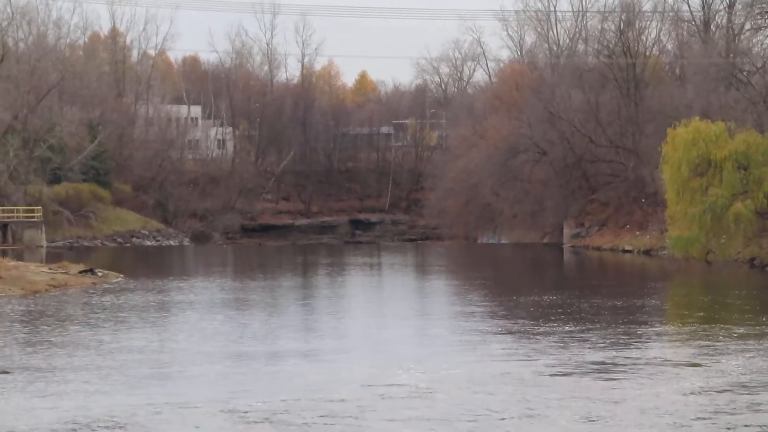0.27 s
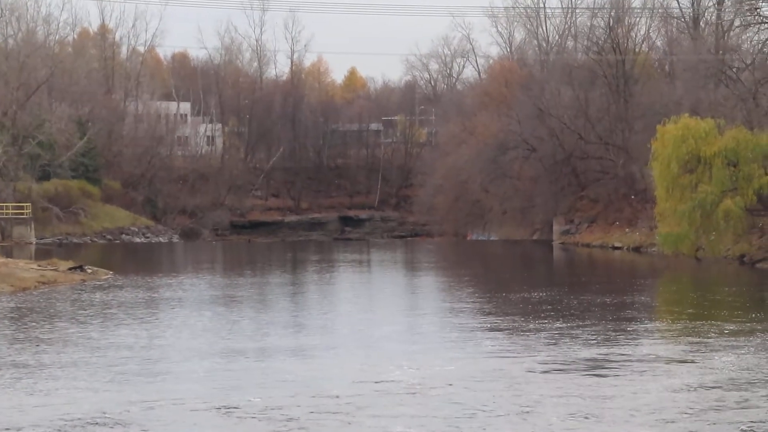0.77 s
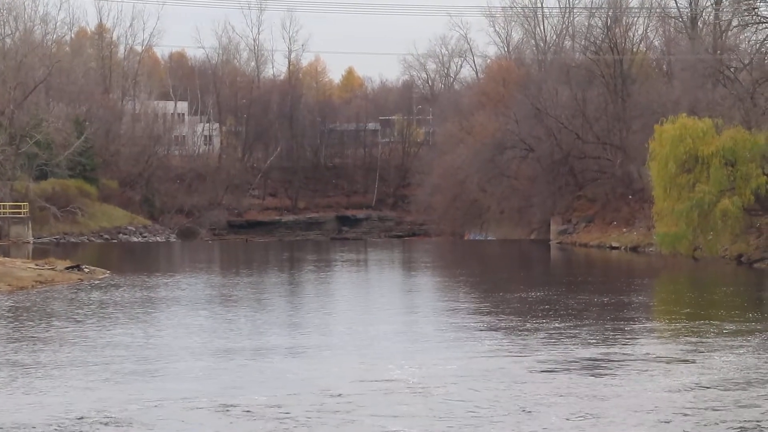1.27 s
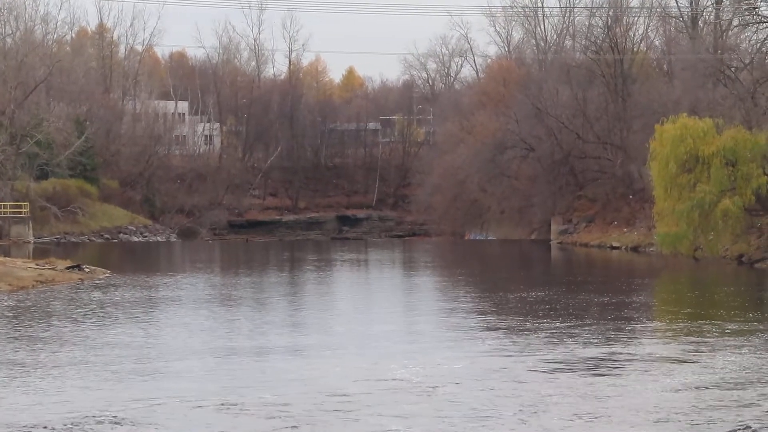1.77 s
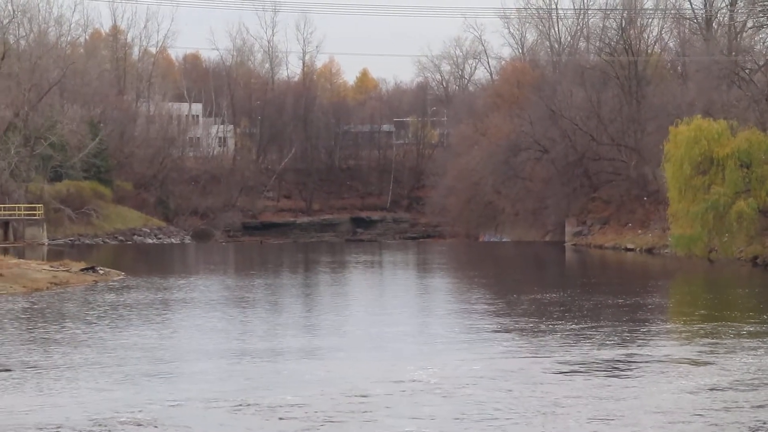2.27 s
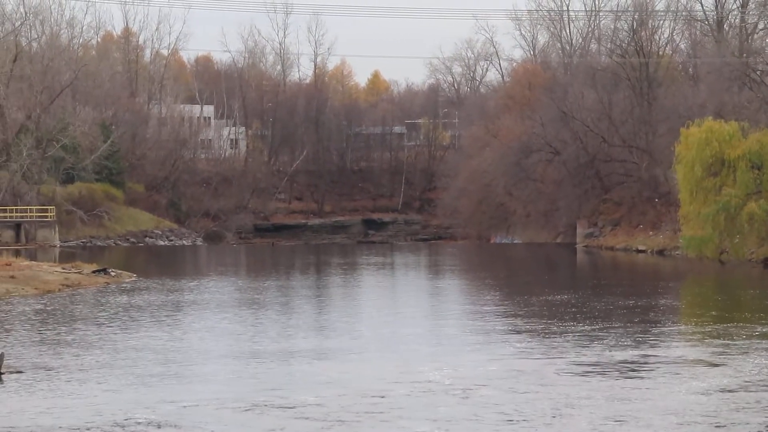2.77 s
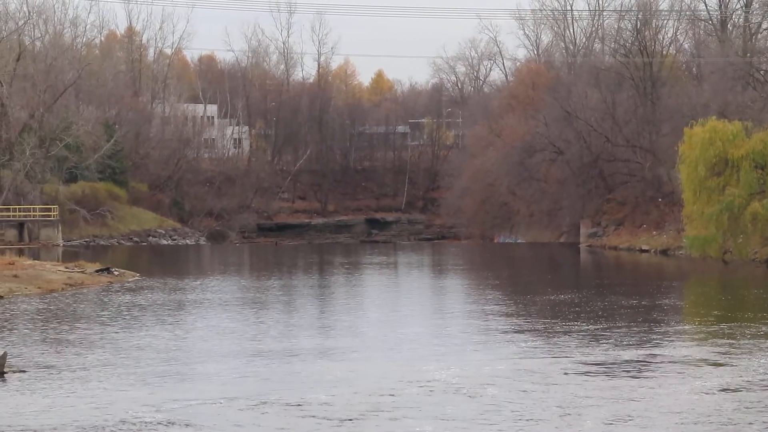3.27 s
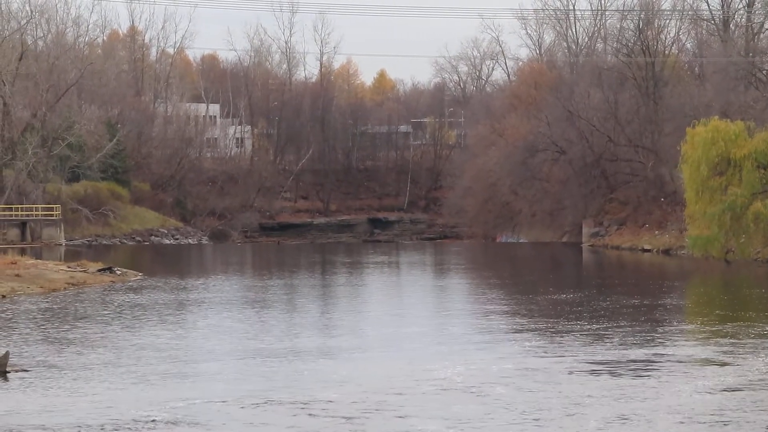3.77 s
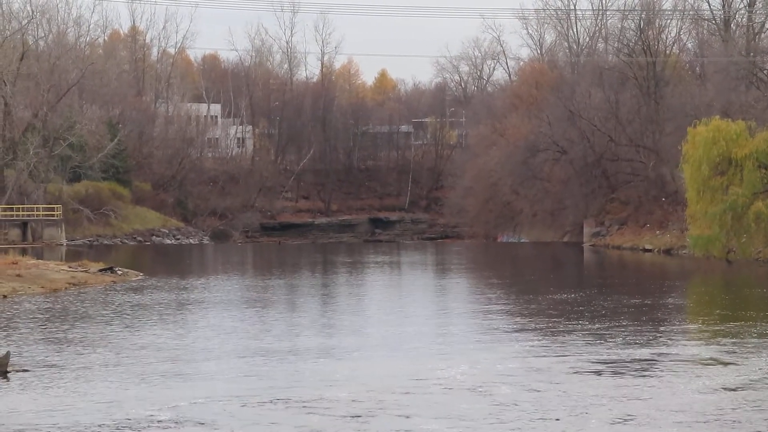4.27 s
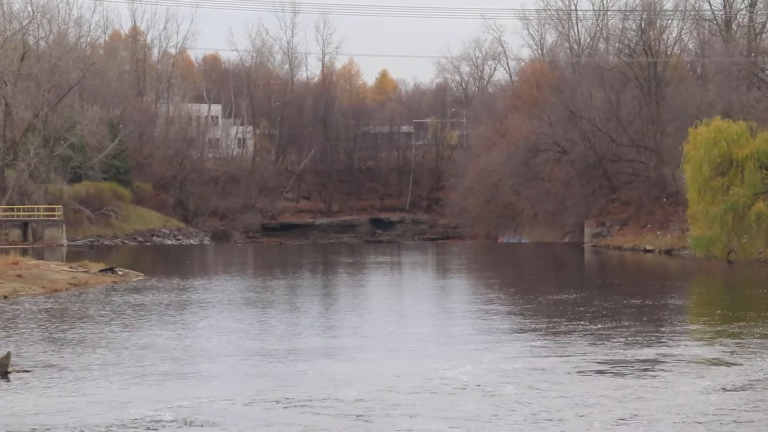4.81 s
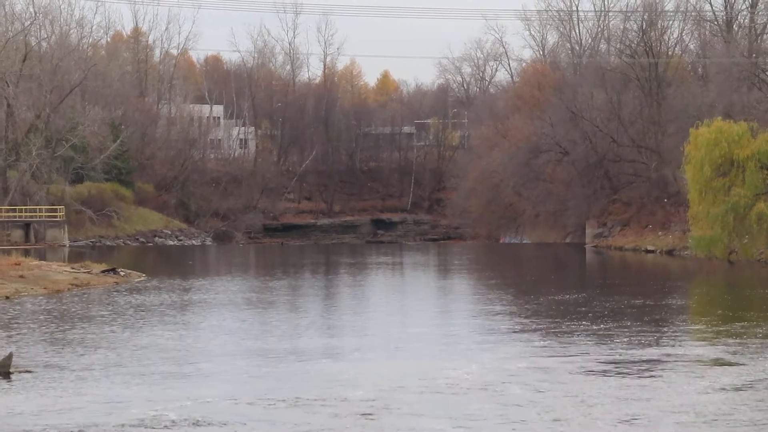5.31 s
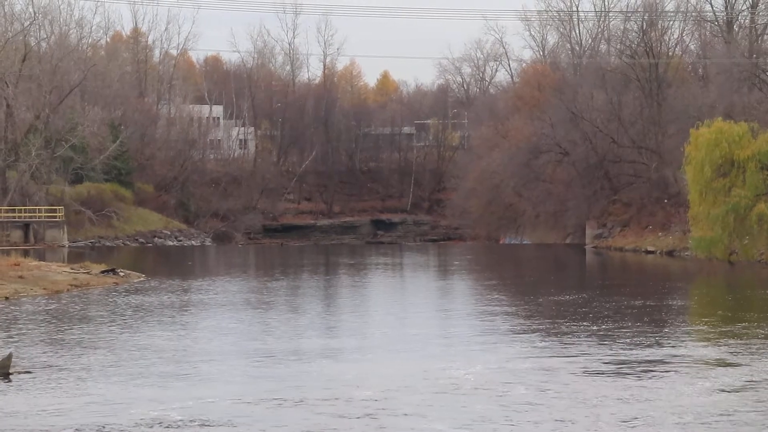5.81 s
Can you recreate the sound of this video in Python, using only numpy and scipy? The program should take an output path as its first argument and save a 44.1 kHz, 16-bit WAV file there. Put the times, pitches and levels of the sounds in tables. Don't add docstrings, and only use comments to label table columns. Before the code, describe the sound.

A steady bed runs throughout: rapids fizzing in the treble, tyre roar in the middle, deep traffic rumble and bridge boom below. The treble is muted for the first quarter second, then opens. A joint ticks at 0.3 s while a lorry hums faintly, strongest near 1 s and gone soon after 1.25 s. From 1.2 s a van pulls away, its low, wavering hum climbing and swelling unevenly. Traffic peaks at 2.0 s with a loud tick and hollow thud; faint knocks follow at 2.25, 2.8 and 3.1 s, then a soft double thud at 3.8 s. A brief tyre whine drops in pitch around 4.2 s. At 4.5 s the van shifts, its note falling, then holding lower. A car revs upward from 4.6 s to the end; a lorry drones in at 5.6 s. Background traffic eases slightly. Close, narrow stereo outdoors, with a very short bank echo.

```python
import sys
import numpy as np
from scipy import signal
from scipy.fft import rfft, irfft, next_fast_len
from scipy.io import wavfile
from scipy.ndimage import uniform_filter1d, map_coordinates

SR = 44100
rng = np.random.default_rng(int(sys.argv[2]) if len(sys.argv) > 2 else 0)


def volts(x):
    e = np.asarray(x, float) / 20
    return 10 ** e


def output_pcm(signal):
    pcm = np.clip(np.atleast_2d(signal).T, -1, 1) * 32767
    wavfile.write(sys.argv[1], SR, np.round(pcm).astype(np.int16))


N = 266805

# start_s, swell_db
TRAFFIC_SWELL = [(0, -.5), (.4, 0.1), (1.2, .5), (1.9, 0.1), (2.03, 1.5), (2.15, 0.5), (2.9, 0),
                 (3.8, -0.07), (4.3, -0.7), (5.3, -0.97), (6.05, -1)]
# freq_hz, level_db
BOOM_SPECTRUM = [(15, -45), (25, -20), (33, 9), (40, 5), (48, 14), (62, -31), (90, -51.5)]
# freq_hz, level_db
RUMBLE_SPECTRUM = [(35, -28), (55, -5.5), (75, -1), (110, -1), (180, -2.5), (240, -3), (320, -4.5),
                   (420, -10.5), (520, -15), (700, -49)]
# freq_hz, level_db
TYRE_SPECTRUM = [(240, -7), (400, -7), (542, -2.5), (891, -2), (2390, -13.5), (3000, -21.5), (3900, -29.5),
                 (6600, -120)]
# freq_hz, level_db
RAPIDS_SPECTRUM = [(1300, -11), (2200, -10), (2900, -4.5), (3500, -8), (5000, -10), (6500, -14),
                   (8300, -20), (10000, -22.5), (12000, -24)]
# start_s, tick_db, thud_db
KNOCKS = [
    (0.3254, -17, -22),
    (2.0168, -17.5, -17),
    (2.2544, -27, -26),
    (2.7654, -27, -26),
    (3.0574, -26, -27),
    (3.824, -32, -19),
    (3.841, -30, -18),
]
# freq_hz, level_db, t60_s
TICK_MODES = [(1200, -4, .013), (1570, -1, .013), (2025, 2, .015), (2720, -1, .012), (3280, -3, .012),
              (3950, -8, .01), (4350, -4, .013), (6100, -15, .009)]
# freq_hz, level_db, t60_s
THUD_MODES = [(190, -4, .05), (260, -4, .045), (340, -4, .045), (445, 0, .07), (620, -5, .04),
              (780, -7, .03)]
# start_s, pitch_hz, level_db
TYRE_WHINE = [
    (4.12, 254.7, -48),
    (4.2, 253.6, -33),
    (4.28, 241.8, -23.5),
    (4.35, 225, -37),
]
# start_s, firing_hz, level_db
IDLING_LORRY = [
    (0.3, 103.4, -46),
    (0.45, 102.6, -37),
    (0.7, 103.3, -32),
    (0.95, 107.2, -27.5),
    (1.1, 113.5, -31.5),
    (1.25, 120, -28.5),
]
# start_s, firing_hz, level_db
LATE_DRONE = [
    (5.55, 84.7, -38),
    (5.72, 86.2, -28),
    (6.05, 88.3, -29),
]
# start_s, firing_hz, level_db
FOLLOWING_CAR = [
    (4.62, 95.5, -31),
    (4.72, 104.2, -26),
    (4.84, 116.6, -30),
    (5.08, 126, -21),
    (5.2, 128.7, -23.5),
    (5.44, 139.4, -22.5),
    (5.8, 141.3, -19),
    (6.05, 147.6, -19),
]
# start_s, firing_hz, effort_db
VAN_ENGINE = [(1.2, 43.27, -9), (1.34, 50.7, 2), (1.46, 55.7, 0), (1.75, 62.45, .1), (1.95, 66.77, 4),
              (2.1, 69.2, 1), (2.35, 71.2, 0.5), (2.9, 79.97, 1.5), (3.45, 87.45, 0), (3.75, 91.95, 2.5),
              (4.01, 96.8, -.5), (4.34, 101.1, 1), (4.46, 102.2, 2), (4.62, 93.05, 1), (4.8, 86.56, -2.8),
              (4.95, 84.7, 3.5), (5.5, 86.16, -4), (6.05, 87, -2.5)]
# multiple of the firing rate, level_db, share needing load (0-1)
VAN_STRONG_ORDERS = [(1, 0, 0.18), (2, -0.83, .02), (3, -5.5, .7), (4, -15, 0.51)]
# multiple of the firing rate, level_db
VAN_FAINT_ORDERS = [(5, -3.5), (6, -6)]
# centre_hz, width_hz, level_db
SILENCER_BANDS = [(74, 8, -29), (96.5, 7.5, -22.5), (102.8, 7.5, -20.5), (111, 11, -17), (121.5, 12, -21),
                  (148, 12.5, -21.5), (163, 17, -22.5), (175, 10, -19.5), (187, 12, -24), (200, 16, -30),
                  (225, 28, -24), (256, 30, -21.5), (358, 34, -13), (395, 42, -18)]
# centre_hz, width_hz, level_db
PIPE_RESONANCES = [(376, 67, -28.5), (422, 20, -41.5), (458, 23, -28.5)]
# freq_hz, share_db
PORT_UNLIKE = [(45, -52), (80, -39), (180, -27), (370, -20.5), (700, -27.5), (1400, -22), (3000, -13.5),
               (5000, -7.5), (8000, -28), (11000, -9), (14000, -7.5)]
# freq_hz, lead_rad
PORT_LEAD = [(0, 0), (2400, .2), (4600, .65), (7000, 1.5), (9300, 1.7), (14200, 3.1), (16000, 3.4)]
# freq_hz, left_over_right_db
PORT_TILT = [(60, 0), (110, 0.088), (200, 0.0), (370, 0.24), (680, 0.42), (1240, 2.15), (2280, 1.4),
             (4170, 1.6), (7650, 1.5), (14000, 0.5)]
# freq_hz, level_db
CAPSULE_RESPONSE = [(12000, 0), (13000, -1.5), (14000, -4), (15200, -9)]


def unit(x):
    return x / np.sqrt(np.mean(x ** 2) + 1e-20)


def along(points, hz):
    f, v = np.transpose(points)
    return np.interp(np.log(hz + 1), np.log(f + 1), v)


def curves(rows):
    s, *columns = np.transpose(rows)
    return [np.interp(np.arange(N) / SR, s, column) for column in columns]


def sounding(rows, fade_s=0.093):
    start, end = rows[0][0], rows[-1][0]
    return np.interp(np.arange(N) / SR, [start - fade_s, start, end, end + fade_s], [0, 1, 1, 0])


def wobble(rate):
    knots = rng.standard_normal(int(N * rate / SR) + 4)
    return map_coordinates(knots, [np.arange(N) * rate / SR])


def filtered(x, response):
    m = next_fast_len(N + SR // 4)
    return irfft(rfft(x, m) * response(np.fft.rfftfreq(m, 1 / SR)), m)[..., :N]


def rush(spectrum, patchy_db, spiky_db):
    white = rng.standard_normal((2, N)) * volts(spiky_db * wobble(900))
    z = signal.stft(white, nperseg=512)[2]
    patches = rng.standard_normal(z.shape[1:])
    patches = uniform_filter1d(patches, size=6, axis=0)
    patches = uniform_filter1d(patches, size=12, axis=1)
    pair = signal.istft(z * volts(patchy_db * unit(patches)), nperseg=512)[1][:, :N]
    return unit(filtered(pair, lambda hz: volts(along(spectrum, hz))))


def tone(hz, drift_rad, flutter_db):
    phase = 2 * np.pi * np.cumsum(hz) / SR + drift_rad * wobble(6) + rng.uniform(0, 2 * np.pi)
    return np.sqrt(2) * volts(flutter_db * wobble(9)) * np.sin(phase)


def rapids():
    level_db = -38.5 + 0.24 * wobble(12)
    return volts(level_db) * rush(RAPIDS_SPECTRUM, patchy_db=0.9, spiky_db=1.0)


def deck_boom(swell_db):
    level_db = -35.5 + 1.3 * swell_db + 0.67 * wobble(4.85)
    return volts(level_db) * rush(BOOM_SPECTRUM, patchy_db=0.5, spiky_db=4.0)


def far_rumble(swell_db):
    level_db = -23 + 1.23 * swell_db + 0.2 * wobble(2.85)
    return volts(level_db) * rush(RUMBLE_SPECTRUM, patchy_db=0.5, spiky_db=0.2)


def tyre_roar(swell_db):
    level_db = -24 + swell_db + 0.56 * wobble(9.4)
    return volts(level_db) * rush(TYRE_SPECTRUM, patchy_db=0.42, spiky_db=1.32)


def background():
    swell_db, = curves(TRAFFIC_SWELL)
    return deck_boom(swell_db) + far_rumble(swell_db) + tyre_roar(swell_db) + rapids()


def struck_modes(modes, rise_s):
    t = np.arange(SR // 4) / SR
    ring = np.zeros(len(t))
    for hz, db, t60 in modes:
        level_db = db + rng.normal(0, 1.2) - 60 * t / t60
        ring += volts(level_db) * np.sin(2 * np.pi * hz * t)
    return ring * (1 - np.exp(-t / rise_s))


def knocks():
    out = np.zeros(N + SR)
    for s, tick_db, thud_db in KNOCKS:
        tick = volts(tick_db) * struck_modes(TICK_MODES, rise_s=.0006)
        thud = volts(thud_db) * struck_modes(THUD_MODES, rise_s=.004)
        out[round(s * SR):][:len(tick)] += tick + thud
    return out[:N]


def vehicle(rows):
    hz, db = curves(rows)
    return volts(db) * tone(hz, drift_rad=.18, flutter_db=.5) * sounding(rows)


def silencer(hz):
    passed = volts(-41) ** 2
    for centre, width, db in SILENCER_BANDS:
        passed = passed + (volts(db) / (1 + (2 * (hz - centre) / width) ** 6)) ** 2
    return np.sqrt(passed)


def pipe(hz):
    return sum(volts(db) / (1 + (2 * (hz - centre) / width) ** 2) for centre, width, db in PIPE_RESONANCES)


def van():
    firing_hz, effort_db = curves(VAN_ENGINE)
    revving = uniform_filter1d(np.gradient(firing_hz) * SR, size=SR // 4)
    load = np.clip(revving / 12, .15, 1)
    out = np.zeros(N)
    for order, db, share in VAN_STRONG_ORDERS:
        hz = order * firing_hz
        drive = volts(db + effort_db) * (1 - np.clip(share, 0, 1) * (1 - load))
        out += silencer(hz) * drive * tone(hz, drift_rad=.2, flutter_db=.8)
    for order, db in VAN_FAINT_ORDERS:
        hz = order * firing_hz
        out += load * pipe(hz) * volts(db) * tone(hz, drift_rad=0.74, flutter_db=2.5)
    return out * sounding(VAN_ENGINE, fade_s=0.15)


def ports(alike, unlike):
    side = filtered(unlike, lambda hz: volts(along(PORT_UNLIKE, hz)))

    def skew(hz):
        lead_rad = np.interp(hz, *np.transpose(PORT_LEAD))
        return volts(along(PORT_TILT, hz) / 2) * np.exp(.5j * lead_rad)

    pair = np.array([alike + side, alike - side])
    return filtered(pair, lambda hz: np.array([skew(hz), 1 / skew(hz)]))


def scene():
    alike, unlike = background()
    traffic = knocks() + van()
    for rows in (TYRE_WHINE, IDLING_LORRY, LATE_DRONE, FOLLOWING_CAR):
        traffic = traffic + vehicle(rows)
    bank_echo = np.pad(traffic, (700, 0))[:N]
    return ports(alike + traffic, unlike + bank_echo)


def band_limit(x):
    return signal.sosfilt(signal.butter(12, 15140, fs=SR, output="sos"), x)


def record(dry):
    heard = filtered(dry, lambda hz: volts(along(CAPSULE_RESPONSE, hz)))
    treble = filtered(heard, lambda hz: 1 / (1 + (3800 / (hz + 1)) ** 4))
    held_back = np.interp(np.arange(N) / SR, [0, .05, .23, .245], [0.041, 0.4, .45, 0])
    return band_limit(heard - held_back * treble)


dry = scene()
out = record(dry)
output_pcm(out)
```